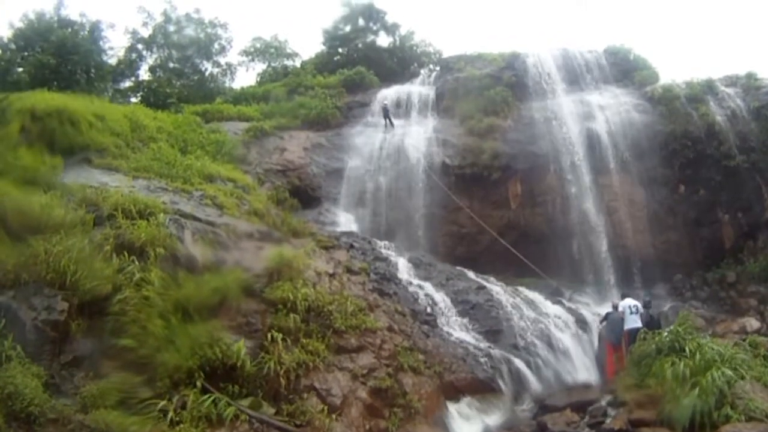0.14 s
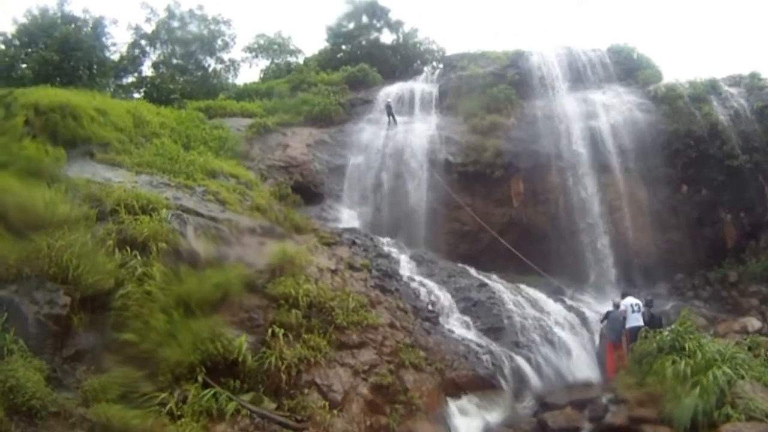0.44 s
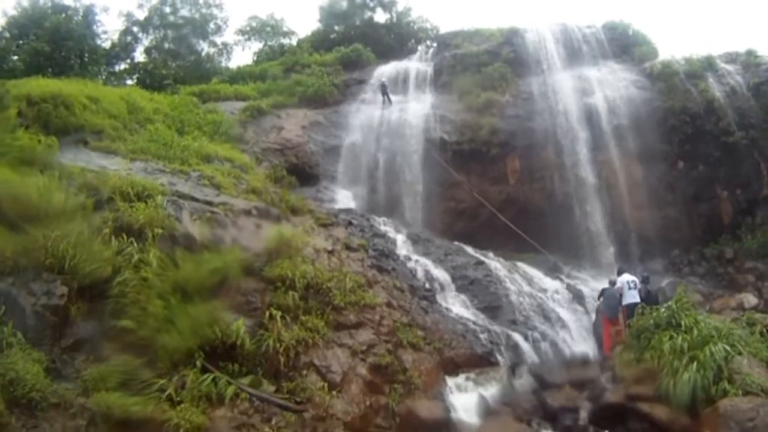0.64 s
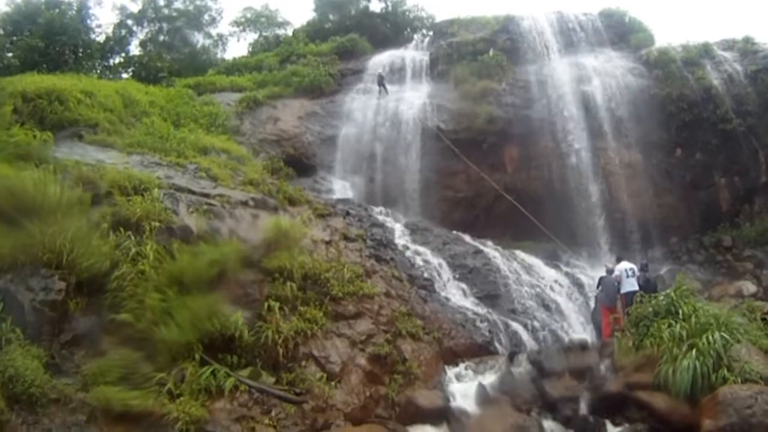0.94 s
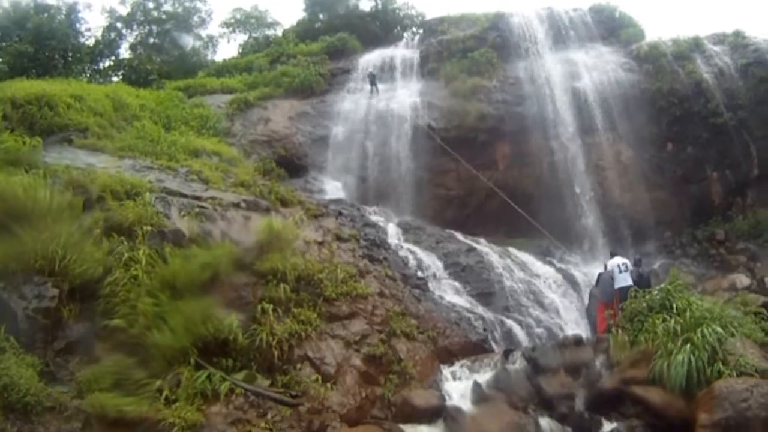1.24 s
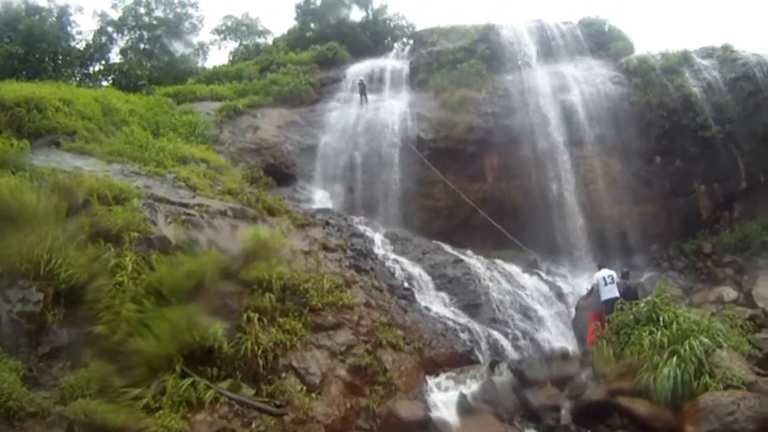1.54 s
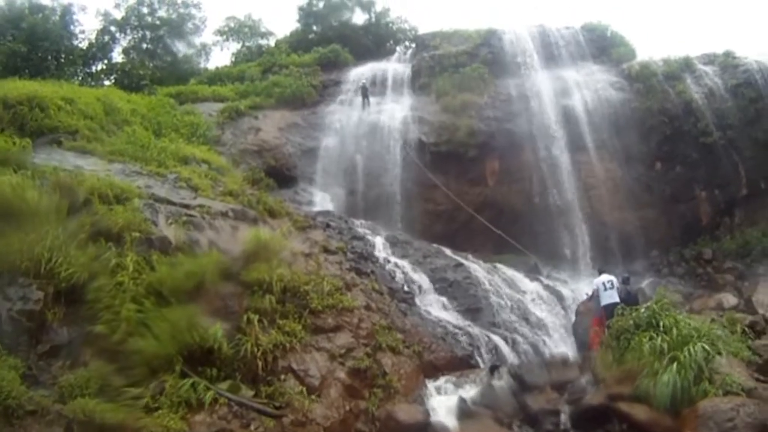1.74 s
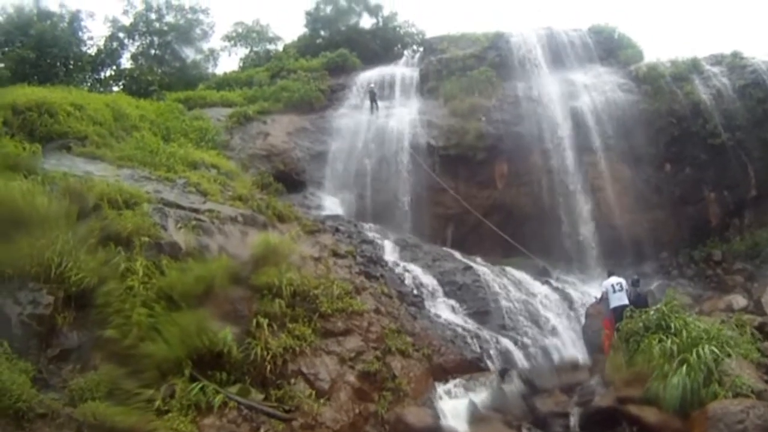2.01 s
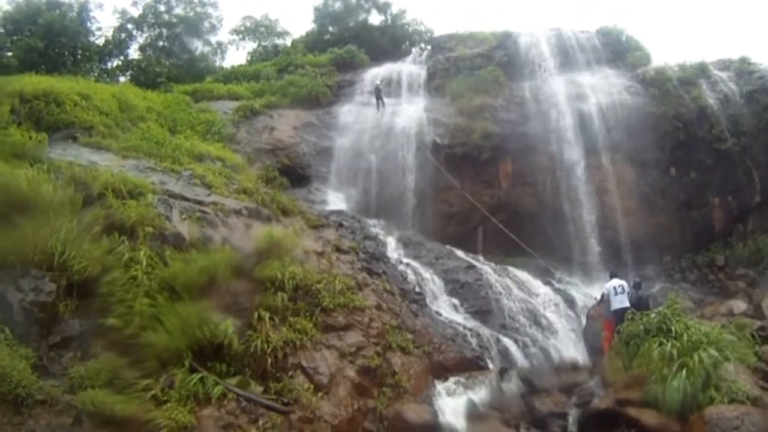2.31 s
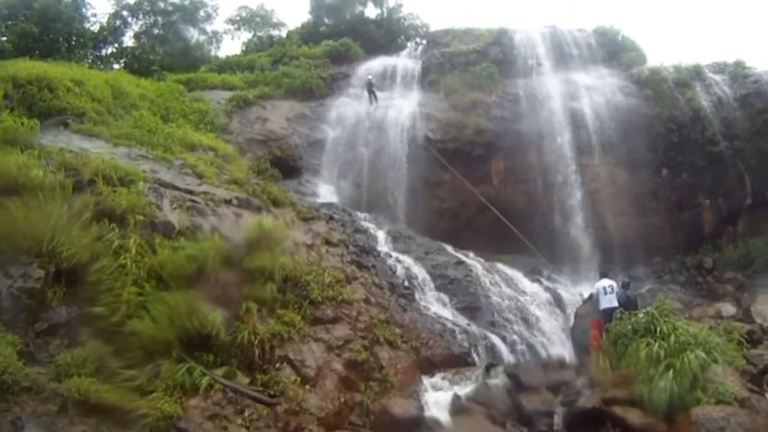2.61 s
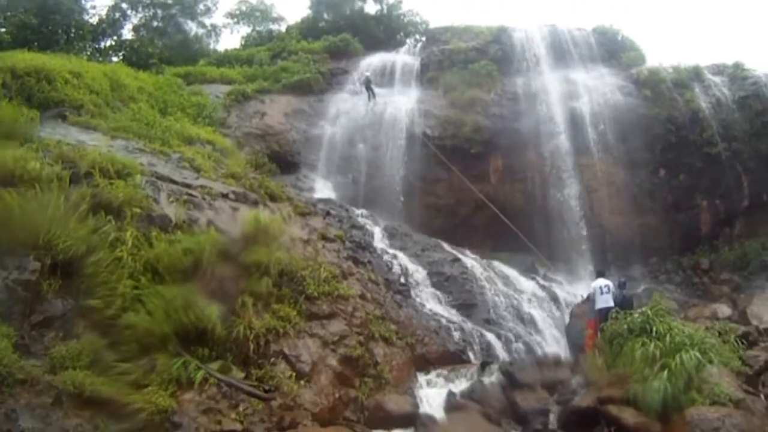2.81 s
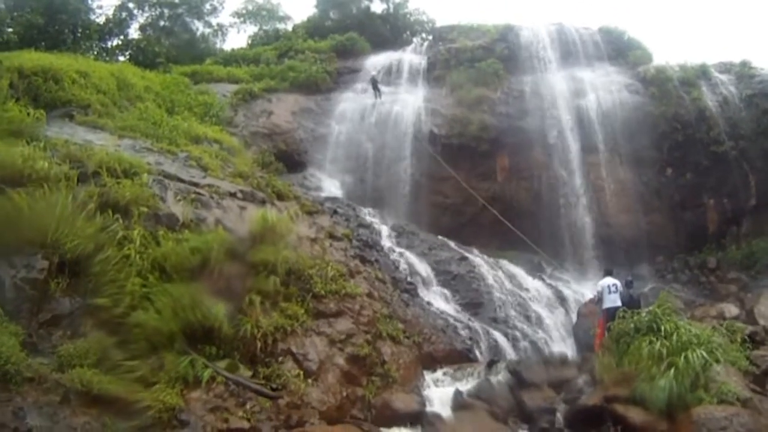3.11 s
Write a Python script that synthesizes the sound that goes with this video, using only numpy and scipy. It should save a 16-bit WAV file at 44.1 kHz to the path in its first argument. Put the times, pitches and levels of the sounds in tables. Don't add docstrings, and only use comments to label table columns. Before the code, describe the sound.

Steady dense rush of a tall waterfall at some distance, with low wind buffeting over it.

```python
import sys
import numpy as np
from scipy import signal
from scipy.fft import rfft, irfft
from scipy.io import wavfile
from scipy.ndimage import uniform_filter1d

SR = 44100
rng = np.random.default_rng(int(sys.argv[2]) if len(sys.argv) > 2 else 0)


def rack_gain(trim_db):
    fader = np.asarray(trim_db, float)
    return 10 ** (fader / 20)


def int16_out(signal):
    q = np.round(np.clip(np.atleast_2d(signal).T, -1, 1) * 32767)
    wavfile.write(sys.argv[1], SR, q.astype(np.int16))


N = 143766


def evened(x):
    return x / np.sqrt(np.mean(x ** 2) + 1e-20)


def read(points, hz):
    point_hz, value = np.transpose(points)
    return np.interp(np.log(hz + 1), np.log(point_hz + 1), value)


def colour(x, db_of):
    hz = np.fft.rfftfreq(len(x), 1 / SR)
    return irfft(rfft(x) * rack_gain(db_of(hz)), len(x))


def drift(seconds):
    size = round(seconds * SR)
    once = uniform_filter1d(rng.standard_normal(N), size)
    return evened(uniform_filter1d(once, size))


def housing(hz):
    # pitch_hz, level_db (per Hz)
    open_air = [(30, -65.5), (200, -45.5), (400, -53.5), (1200, -62), (3000, -63.5), (5200, -66.5),
                (5700, -71.5), (6000, -85)]
    # pitch_hz, width_hz, boost_db
    case_rings = [(574, 57, 8), (642, 28, 1), (813, 74, -8.5), (980, 53, 1.5), (2256, 196, 12),
                  (2608, 128, 5), (3710, 195, 7), (4420, 120, -3)]
    level_db = read(open_air, hz)
    for ring_hz, width_hz, boost_db in case_rings:
        level_db = level_db + boost_db * np.exp(-0.5 * ((hz - ring_hz) / width_hz) ** 2)
    return level_db


def fall():
    roar_db, splash_db, splashes_per_s = -30, -16.5, 1500
    patch_db, flicker_db = 0.54, 0.27
    frames = N // 128 + 5
    real, imaginary, patches = rng.standard_normal((frames, 257, 3)).T
    patches = uniform_filter1d(patches, size=8, axis=0)
    patches = evened(uniform_filter1d(patches, size=16, axis=1))
    spectrum = (real + 1j * imaginary) * rack_gain(patch_db * patches)
    roar = evened(signal.istft(spectrum, nperseg=512, noverlap=384)[1][:N])

    hit, size, sign = rng.random((3, N))
    strength = rack_gain(-3.5 * np.log(size + 0.002))
    splash = (hit < splashes_per_s / SR) * strength * np.sign(sign - 0.5)
    water = roar + rack_gain(splash_db) * evened(splash)
    flow = rack_gain(flicker_db * drift(0.0071))
    return rack_gain(roar_db) * evened(colour(flow * water, housing))


def steadied(x):
    window_s, share = 0.032, 0.99
    power = abs(uniform_filter1d(x ** 2, size=round(window_s * SR))) + 1e-12
    return evened(x / power ** (share / 2))


def wind():
    # pitch_hz, level_db (per Hz)
    rumble_spectrum = [(8, -26), (21, -5.5), (36, 1), (60, 2), (95, 0.5), (140, -6), (190, -15.5),
                       (300, -49.5)]
    # peak_s, level_db, length_s, flutter_share (0 deep, 1 fluttering)
    gusts = [(0.107, -26.5, 0.032, 0.65), (.28, -28.5, 0.059, 0), (0.373, -26.5, 0.086, .6),
             (.47, -23, 0.022, .5), (0.589, -21.5, 0.034, 0.54), (0.66, -20.5, 0.028, 0.3),
             (0.798, -24, 0.041, 0.6), (0.895, -21.5, 0.024, 0.35), (1.058, -30.5, .04, 0.5),
             (1.13, -30, 0.039, 0.9), (1.407, -29.5, 0.17, 0.2), (1.607, -30, 0.077, .3),
             (1.723, -22.5, 0.023, 0.1), (1.774, -24.5, 0.041, 0.76), (1.958, -18.5, 0.04, 0.65),
             (2.091, -22, 0.048, 0.36), (2.193, -26.5, 0.044, 0), (2.33, -29, 0.056, 0.2),
             (2.435, -27.5, 0.026, 0.3), (2.557, -21.5, 0.023, 0.86), (2.626, -18.5, 0.065, 0.3),
             (2.802, -29.5, 0.04, 0.2), (2.893, -20.5, 0.037, 0.35), (3.021, -16, 0.033, 0.02),
             (3.07, -19.5, 0.071, 0.93), (3.14, -19, 0.038, 0.67), (3.238, -25, 0.025, 0.5)]
    # time_s, peak_db, pitch_hz, push (above 0 pushes, below 0 sucks)
    thumps = [(.585, -22, 70, 0.89), (0.605, -13.5, 59.5, 1), (.8, -16, 55, 0.76), (.911, -15.5, 60, -1.1),
              (1.934, -12, 40, -0.75), (1.947, -5.5, 70, 0.94), (2.066, -16, 70, -0.91),
              (2.074, -16.5, 70, 1), (2.081, -15, 79.5, -0.96), (2.093, -20, 60, -1.1),
              (0.116, -24.5, 69, -1.2), (0.477, -19, 70, 1), (1.978, -12.5, 60, -1),
              (2.433, -12, 65, -0.87), (2.611, -15, 45, -0.83), (2.661, -16, 60, -0.9),
              (2.875, -15, 59.5, -1.04), (2.888, -16, 70, 0.78), (2.556, -14.5, 99, 0.95),
              (2.625, -10, 75, 0.9), (3.031, -22, 55, 0.8), (3.064, -10, 98, 1), (3.14, -16, 95, 1),
              (3.153, -14, 79.6, -1)]
    breeze_db, lump_db = -33.5, 1.5
    rise_share = 0.54
    tilt_db, pivot_hz = 4.5, 65
    t = np.arange(N) / SR
    out = np.zeros(N)

    for tilt in (-1, 1):
        power = rack_gain(2 * breeze_db) / 2
        for peak_s, level_db, length_s, flutter_share in gusts:
            share = np.clip(0.5 + tilt * (flutter_share - 0.5), 0, 1)
            side_s = length_s * np.where(t < peak_s, rise_share, 1)
            power = power + share * rack_gain(2 * level_db) * np.exp(-((t - peak_s) / side_s) ** 2)

        def rumble_db(hz):
            octaves = np.log2((hz + 1) / pivot_hz)
            return read(rumble_spectrum, hz) + tilt * tilt_db * np.tanh(octaves)

        rumble = steadied(colour(rng.standard_normal(N), rumble_db))
        out = out + np.sqrt(power) * rack_gain(lump_db * drift(0.021)) * rumble

    for time_s, peak_db, pitch_hz, push in thumps:
        u = (np.pi * pitch_hz * (t - time_s)) ** 2
        out = out + push * rack_gain(peak_db) * (1 - 2 * u) * np.exp(-u)
    return out


def channel_hiss():
    high = signal.butter(6, 14500, "high", fs=SR, output="sos")
    level = rack_gain(-64.5 + 2.8 * drift(0.03))
    return level * signal.sosfilt(high, rng.standard_normal(N)) * np.array([[1], [-1]])


def scene():
    return np.tile(fall() + wind(), (2, 1))


def limiter(dry):
    knee_db, squeeze, recover_db_per_s, unlike_db = -12, 0.43, 54, -25
    level_db = 20 * np.log10(abs(dry[0]) + 1e-6)
    slope = np.arange(N) * recover_db_per_s / SR
    held_db = np.maximum.accumulate(level_db + slope) - slope
    over_db = np.maximum(held_db - knee_db, 0)
    cut_db = squeeze * uniform_filter1d(over_db, size=200)
    channel_share = 0.5 + rack_gain(unlike_db / 2) * np.array([[-1], [1]]) / 2
    return dry / rack_gain(cut_db * channel_share)


def slow_sampling(x):
    up, down, hold = 40, 147, 4
    slow = signal.resample_poly(x, up, down, axis=1, window=("kaiser", 8.0))
    held = np.repeat(slow, hold, axis=1)
    return signal.resample_poly(held, down, up * hold, axis=1)[:, :N]


def roll_off(x):
    return signal.sosfilt(signal.butter(12, 16360, fs=SR, output="sos"), x)


def record(dry):
    # pitch_hz, level_db
    range_edges = [(4, -40), (14, 0), (15000, 0), (15110, -8), (15135, -90)]
    played = slow_sampling(limiter(dry)) + channel_hiss()
    mix = np.array([colour(x, lambda hz: read(range_edges, hz)) for x in played])
    return roll_off(mix)


dry = scene()
out = record(dry)
int16_out(out)
```